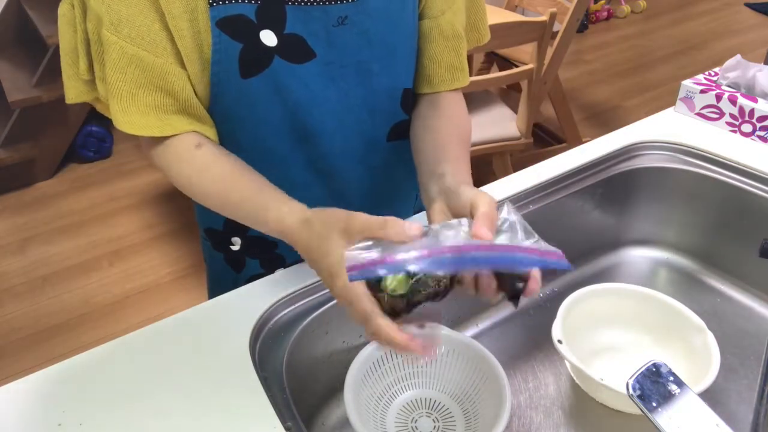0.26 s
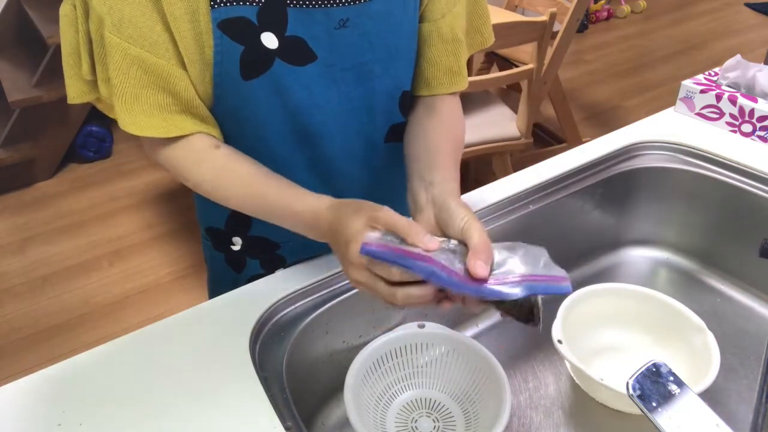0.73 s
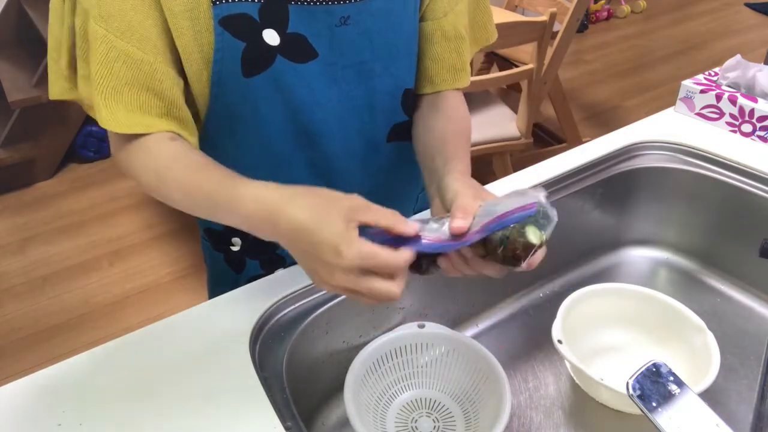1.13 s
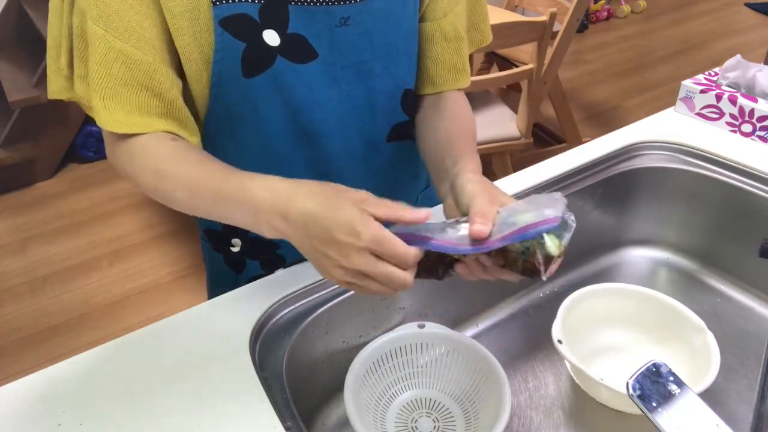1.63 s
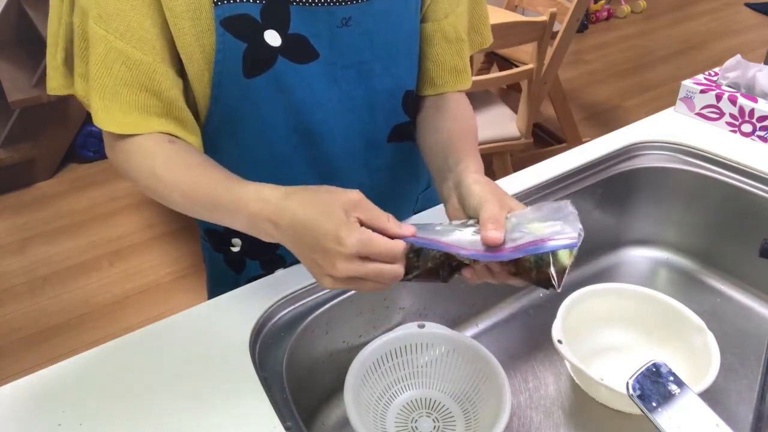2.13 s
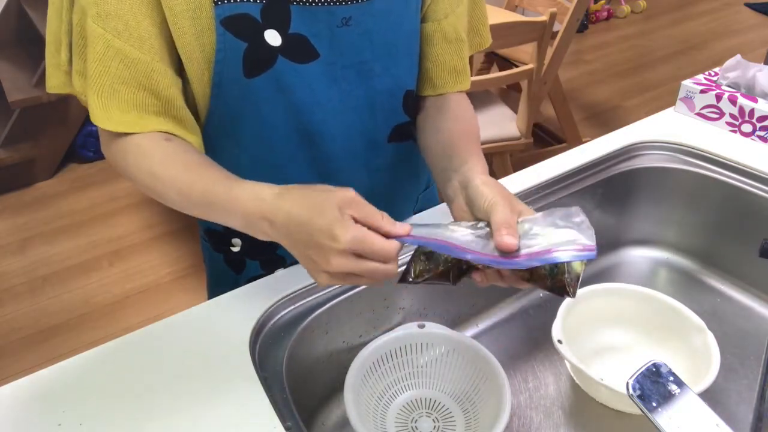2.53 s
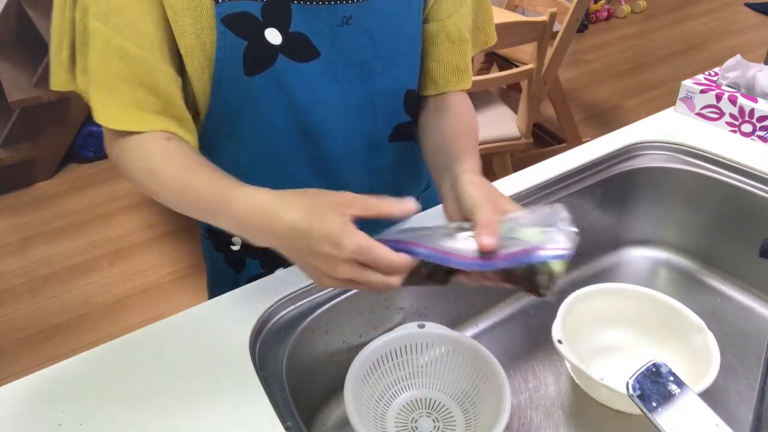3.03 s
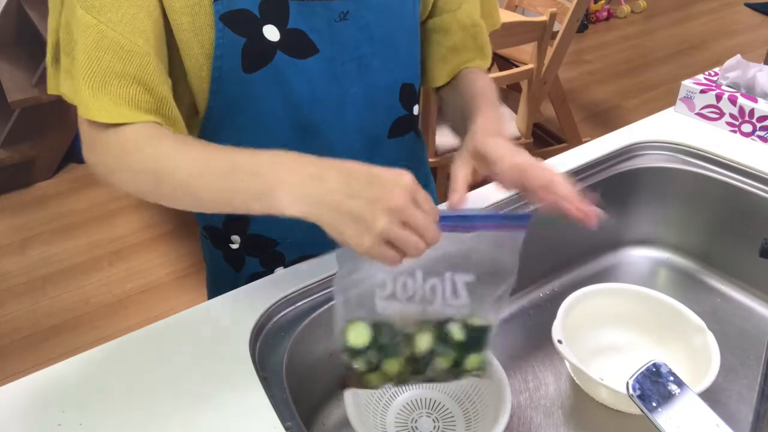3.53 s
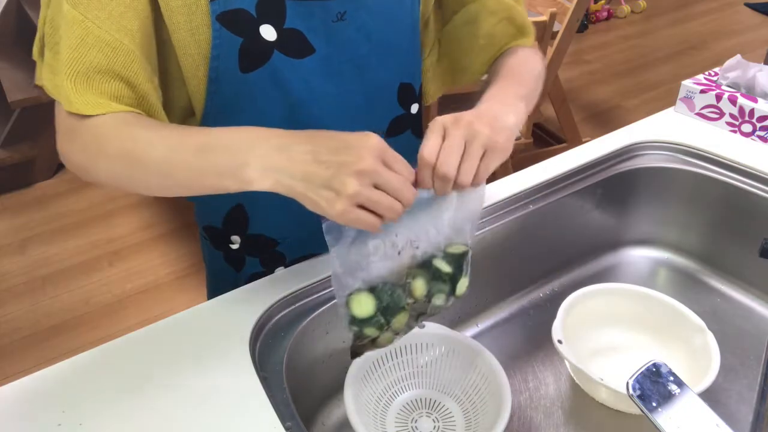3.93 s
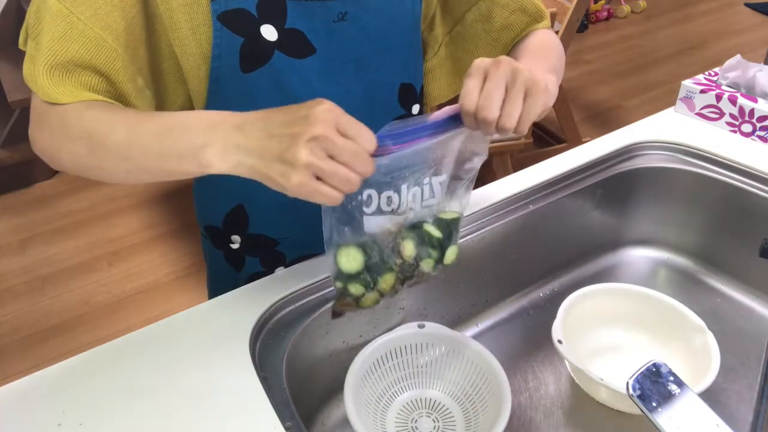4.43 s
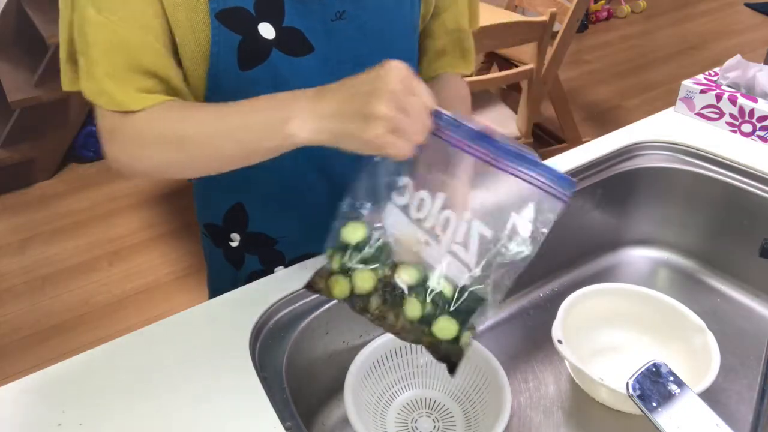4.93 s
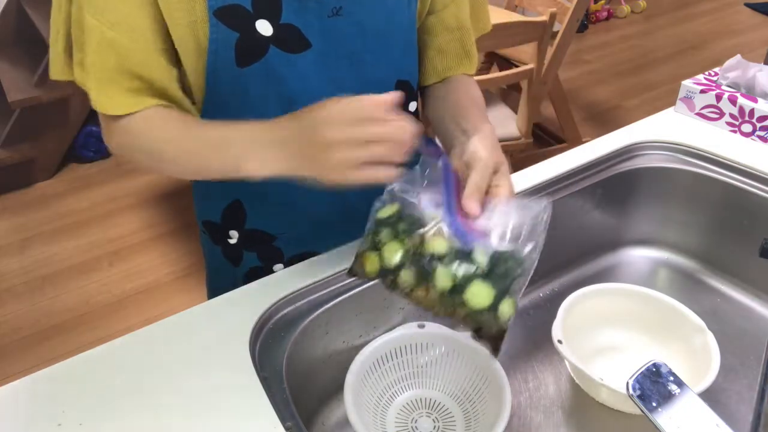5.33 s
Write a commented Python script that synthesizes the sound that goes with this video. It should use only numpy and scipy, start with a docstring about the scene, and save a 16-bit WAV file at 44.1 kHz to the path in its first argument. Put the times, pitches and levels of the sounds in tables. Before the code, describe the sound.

Thin plastic film crackles busily at first, then quiets so that irregular, sharp clicks of a seal being pressed stand out alone. Past the middle the bag crumples suddenly with a deep thump and wet slosh. Fingers slide faintly along the ridge, crackle thins to almost nothing, then rustling returns to the end. Close microphone, small kitchen with brief sink reflections and quiet bassy hum.

```python
"""Hands press shut the seal of a plastic zipper bag over a steel sink in a kitchen, over a quiet room hum.
For the first second snaps crowd over crackle; then bright seal snaps come singly until a busier burst
with a heavy thud near 3.4 s. Fingers hiss along the ridge, crackle thins, and a last flurry starts near 4.9 s.
Snaps and crackles are noise-kicked short rings, taps fading sines, the rest shaped noise and soft blows;
sparse echoes and fading noise answer all but the thudding, sloshing contents and the hum."""
import sys
import numpy as np
from scipy import signal
from scipy.fft import rfft, irfft
from scipy.io import wavfile
from scipy.ndimage import uniform_filter1d

SR = 44100
rng = np.random.default_rng(int(sys.argv[2]) if len(sys.argv) > 2 else 0)


def dump(signal):
    """Clip the signal to [-1, 1] and save it as 16-bit WAV at the path in sys.argv[1]."""
    limited = np.clip(np.atleast_2d(signal).T, -1, 1)
    pcm = np.round(limited * 32767).astype(np.int16)
    wavfile.write(sys.argv[1], SR, pcm)


N = 245637

POP_SPAN_S = .0008  # pop levels are nominal rms over this span
LOWEST_HZ, LOWEST_SPREAD_OCT = 830, .18
UPPER_HZ, LOWER_HZ, NEIGHBOUR_SPREAD_OCT = 5280, 2410, 0.33


def pops():
    """Loud single snaps: seal and creases let go abruptly and ring at their own pitches."""
    start_s, ring_db, pitch_hz = pop_rings()
    count = len(start_s)
    ring_hz = pitches(count)
    spread = 2 ** (NEIGHBOUR_SPREAD_OCT * rng.standard_normal(count))
    ring_hz[0] = LOWEST_HZ * 2 ** (LOWEST_SPREAD_OCT * rng.standard_normal(count))
    ring_hz[1] = np.where(pitch_hz < SPLIT_HZ, pitch_hz, LOWER_HZ * spread)
    ring_hz[2] = np.where(pitch_hz < SPLIT_HZ, UPPER_HZ * spread, pitch_hz)
    return np.sqrt(POP_SPAN_S * SR) * film(start_s, ring_db, ring_hz, slip_s=0.00009)


# pops of seal and creases: start_s, level_db, pitch_hz, lowest_ring_db (re level), highest_ring_db (re level)
SNAPS = [(0.0083, -24, 2320, -23, 1), (0.015, -17.5, 2380, -18, -2), (0.0289, -13.5, 1940, -28, -20),
         (0.106, -18.5, 1680, -11, -6), (0.1132, -22.5, 2580, -17, -14), (0.1262, -21.5, 4610, -16, -12),
         (0.148, -27, 6800, -11, 0), (0.1535, -20.5, 5400, -20, -27), (0.1778, -28, 6840, -25, -13),
         (0.2008, -31, 1850, -5, -19), (0.225, -23.5, 3796, -35, -8.5), (0.2824, -46, 4290, 10, -10),
         (0.2984, -22.5, 2300, -23, -25), (0.3085, -31, 2890, -23, 3.5), (0.3258, -25.5, 3060, -2.5, -30),
         (0.338, -25.5, 4710, -15, -25), (0.3476, -24.5, 2530, -5, -8), (0.3536, -20, 2580, -8.5, -9),
         (0.374, -21.5, 2100, -14, -21), (0.3936, -19, 2760, -17, -24), (0.4124, -28, 5430, -23, -19),
         (0.4438, -20, 3340, -35, -14), (0.4471, -22.5, 2660, -4, -22), (0.4582, -20, 4660, -11, 2),
         (0.4774, -20, 2600, -6, -27), (0.4922, -19.5, 4230, -25, -10), (0.5122, -27, 3570, -16, -23),
         (0.5429, -25, 2290, -8, -12), (0.5527, -14, 6900, -12, -4), (0.5674, -17.5, 3000, -12, -8),
         (0.601, -23, 2120, -22, -30), (0.6186, -22.5, 2780, -14, -15), (0.6372, -23.5, 2240, -18, -13),
         (0.6519, -22, 2540, -25, -4), (0.6564, -24.5, 1870, -21, 2), (0.6884, -15, 2540, -5.5, -3.5),
         (0.7734, -18.5, 6370, -12, -6.5), (0.8039, -18, 2480, -11, -20), (0.8242, -25, 3960, -19, -9),
         (0.885, -32.5, 2540, -21, -30), (0.978, -30.5, 2650, 3.5, -10), (1.0894, -43.5, 2420, -8, -23),
         (1.109, -40, 2840, -7, -12), (1.1348, -38, 1510, -3, -17), (1.163, -38.5, 2070, -7, -31),
         (1.1826, -46, 2670, -13, -13), (1.3052, -46, 2210, -4, -32), (1.4059, -19.5, 6000, -12.5, -5.5),
         (1.586, -43.5, 5660, 1, -3), (1.6556, -38.5, 2400, 7.5, -22), (1.7035, -13.5, 6850, -14, 2),
         (1.7259, -8.5, 6630, -22, -8), (1.777, -23.5, 3330, -11.5, -21), (1.9353, -29.5, 2580, -2, -48),
         (1.967, -29, 1940, -18, -35), (2.0087, -45, 5640, -14, 2), (2.0143, -44, 6240, -5, -1),
         (2.0215, -35, 2760, -7, -27), (2.0336, -24, 4730, -8, -19), (2.0456, -14, 6460, -19.5, 6.5),
         (2.0638, -24.5, 6170, -6, -3), (2.067, -13, 6550, -20, 2.5), (2.1016, -25, 4010, -10.5, -10),
         (2.2874, -31.5, 2600, 1, -1.5), (2.3364, -35.5, 3750, -7, -27), (2.3476, -33, 1510, -6, -11),
         (2.3699, -44, 5200, 2.5, -10), (2.3921, -11, 6140, -27.5, -2), (2.4225, -26.5, 2710, -32, 0),
         (2.669, -42.5, 2400, 0, -10), (2.7001, -42, 2020, -12, -30), (2.7099, -12, 6500, -23, 2),
         (2.8994, -42, 2240, -18, -16), (2.9113, -38.5, 1920, -15.5, -7), (2.926, -40.5, 1510, -6, -10),
         (3.1054, -44, 3620, 3, -16), (3.1377, -34.5, 1970, -15, -9), (3.1518, -32, 1980, -5, -37),
         (3.1788, -35, 1840, -9, -25), (3.2286, -26.5, 2540, -5.5, -16), (3.2609, -32.5, 3100, -2, -20),
         (3.2782, -20.5, 3560, -13, -3.5), (3.281, -25, 6020, -27, -7), (3.2913, -23, 4090, -8, -3),
         (3.2959, -20.5, 2300, -3.5, -3), (3.3512, -17, 2240, -15, -18), (3.3606, -19.5, 3140, -11, -21),
         (3.3701, -11, 4660, -17, -10), (3.395, -20, 2500, -7, -21), (3.4433, -24, 2430, -4, -7),
         (3.5182, -29.5, 2450, 1, -22), (3.6033, -36.5, 1560, -1, -6), (3.6505, -48, 6350, 16.5, 1),
         (3.6992, -35.5, 3300, -3.5, -3.5), (3.915, -50, 1950, -5, -1), (4.0084, -29, 7400, -23, -0.5),
         (4.2036, -45, 2020, -8, -27), (4.2283, -45, 1700, -17, -6), (4.356, -46, 2240, 3, -27),
         (4.3666, -42.5, 2240, -6, -18), (4.3961, -40.5, 4340, 3, -13), (4.4662, -43, 1940, -2, -29),
         (4.479, -45, 6300, -10, -6), (4.5043, -50.5, 1510, 10, -20), (4.5336, -49, 1590, 5, -29),
         (4.6005, -39.5, 2430, 1.5, -21), (4.6036, -33.5, 3840, -20, -30), (4.6251, -39.5, 1510, 4, -24),
         (4.7036, -39, 2020, -0.5, -24), (4.7561, -44.5, 1500, 0, 0), (4.9285, -37, 6680, 4.5, -8),
         (4.9388, -19.5, 2720, 1, -27), (4.9933, -30, 1890, -13, -7), (5.017, -30, 2020, -7, -9),
         (5.034, -40, 1510, 7, -30), (5.0427, -33, 1510, 4, -2), (5.105, -22.5, 2720, -10, -3.5),
         (5.1732, -27.5, 1940, -7, -13), (5.195, -30, 2370, -5, -10), (5.1989, -15, 2160, -23, -4),
         (5.2425, -33, 3960, -25, -17), (5.2693, -15, 2420, -34, -3.5), (5.2832, -24, 2300, -28, -23),
         (5.3021, -26, 5700, -3, -19), (5.3278, -27, 1680, -2, 1), (5.3496, -21, 3340, -4.5, -11),
         (5.392, -34, 2500, -6, -32), (5.4474, -24, 2980, -7, -7), (5.451, -33, 5600, -22, -14),
         (5.503, -47, 7100, -15, -16)]
SPLIT_HZ = 3800  # main ring: second below, third above
UPPER_SHARE, LOWER_SHARE = 0.41, 0.5  # lean of the neighbour ring to the outer ring beside it


def pop_rings():
    """Start, ring levels and pitch of each pop; the neighbour of the main ring leans to the outer one."""
    start_s, level_db, pitch_hz, lowest_db, highest_db = np.transpose(SNAPS)
    low = pitch_hz < SPLIT_HZ
    second_db = level_db + LOWER_SHARE * lowest_db * ~low
    third_db = level_db + UPPER_SHARE * highest_db * low
    return start_s, [level_db + lowest_db, second_db, third_db, level_db + highest_db], pitch_hz


# film rings, lowest first: usual_hz, pitch_spread_oct, t60_s
FILM_RINGS = [(800, .3, .003), (2400, .35, .0014), (6000, .35, .0007), (12000, .1, .0003)]


def film(start_s, ring_db, ring_hz, slip_s, size=256):
    """A crease gives way in a short stutter that kicks all the rings together."""
    t = np.arange(size) / SR
    kick = rng.standard_normal((len(start_s), size)) ** 3 * np.exp(-t / slip_s)
    rings = 0
    for k, ((_, _, t60_s), db, hz) in enumerate(zip(FILM_RINGS, ring_db, ring_hz)):
        # swelling before the fade keeps a ring out of its neighbours' range
        shape = np.sin(2 * np.pi * hz[:, None] * t) * t * 1000. ** (-t / t60_s)
        ring = signal.fftconvolve(kick, shape, axes=1)[:, :size]
        ring = ring * undb(db)[:, None] / np.linalg.norm(ring, axis=1, keepdims=True)
        # opposite senses let neighbouring rings fill the gap between them
        rings = rings + (-1) ** k * ring
    place = (np.clip(start_s, 0, None) * SR).astype(int)[:, None] + np.arange(size)
    out = np.bincount(place.ravel(), rings.ravel(), N + 2 * size)[:N]
    # thin film moves no air in the bass
    return signal.sosfilt(signal.butter(2, 220, "high", fs=SR, output="sos"), out)


def pitches(count):
    """Every crease has its own size, so its rings have their own pitch."""
    usual_hz, spread_oct, _ = np.transpose(FILM_RINGS)
    ring_hz = usual_hz * 2 ** (spread_oct * rng.standard_normal((count, len(usual_hz))))
    return np.clip(ring_hz, 100, .4 * SR).T


# how busy the hands are: time_s, crackle_db (before size and gain), top_end_db (re crackle)
HANDS = [(0, -24.5, 3.5), (.1, -31.5, -7.5), (.28, -46.5, -9), (.31, -37, -2), (.34, -38, 4),
         (.5, -33.5, -5), (.68, -37, -1.5), (.84, -42, -9), (.95, -51, 0), (1.12, -58.5, -9),
         (1.33, -66, -3), (1.62, -56, -3), (1.9, -55.5, -12), (2.03, -47, -4), (2.24, -60.5, 4),
         (2.36, -50, 1.5), (2.59, -64, -2), (2.68, -56, 4), (2.87, -61, -2), (2.94, -60.5, -6),
         (3.02, -61, 5), (3.1, -44.5, -1.5), (3.22, -53, -1), (3.3, -37, -2), (3.34, -39, 1),
         (3.365, -23.5, -3), (3.41, -33.5, -4), (3.5, -47, -11), (3.7, -58, -1.5), (4.33, -61, -1.5),
         (4.41, -52, -11.5), (4.74, -56.5, -1), (4.86, -69, -9), (4.96, -34, -10.5), (5.1, -47.5, -3),
         (5.16, -50, 0), (5.19, -37.5, -5), (5.26, -33.5, -5), (5.45, -47.5, -9), (5.57, -58, -4)]
BODY_DB, TOP_SHARE, TOP_DB = -4, .67, -4  # lowest ring re crackle; highest ring follows the top end


def crackle(count=4500):
    """Many small creases let go at random, under the hands and after each pop; a few are much bigger."""
    chance = rng.random((count, 6))
    at = (chance[:, 0] * (N - 1)).astype(int)
    pop_s, pop_db, _ = pop_rings()
    crackle_db, top_db = curve(HANDS)
    tilt_db = [BODY_DB, 0, top_db, TOP_SHARE * top_db + TOP_DB]
    size_db = np.minimum(-4.2 * np.log(chance[:, 1]), 15) - 3 + 3.1 * walk(60)[at]
    ring_db = []
    for tilt, db, luck in zip(tilt_db, pop_db, chance[:, 2:].T):
        power = undb(crackle_db + tilt) ** 2 + settling(db, pop_s)
        ring_db.append(10 * np.log10(power)[at] + size_db + 8 * (luck - .5))
    return undb(6) * film(at / SR, ring_db, pitches(count), slip_s=0.00028)


AFTER_DB, AFTER_T60_S = -20.5, 0.29  # start re pop ring, fade


def settling(ring_db, start_s):
    """Creases settle after each pop: crackle power jumps and dies away."""
    jumps = np.bincount((start_s * SR).astype(int), undb(ring_db + AFTER_DB) ** 2, N)
    return signal.lfilter([1], [1, -1e6 ** (-1 / (AFTER_T60_S * SR))], jumps)


# taut pockets of the bag: start_s, initial_amplitude_db, pitch_hz
POCKETS = [(.689, -22, 690), (.805, -30, 680), (.978, -30, 1130), (1.656, -38, 1150), (1.936, -36, 600),
           (3.651, -32, 690), (4.604, -36, 3950), (5.199, -20, 2300), (5.27, -20, 2330)]
TAP_T60_CYCLES = 28


def taps(size=4096):
    """Hollow taps: each taut pocket rings at one pitch and fades in a set number of cycles."""
    start_s, amplitude_db, pitch_hz = np.transpose(POCKETS)[:, :, None]
    cycles = pitch_hz * np.arange(size) / SR
    ring = undb(amplitude_db) * np.sin(2 * np.pi * cycles) * 1000. ** (-cycles / TAP_T60_CYCLES)
    place = (start_s * SR).astype(int) + np.arange(size)
    return np.bincount(place.ravel(), ring.ravel(), N)


# finger and thumb run along the seal: time_s, gain_db
SLIDE_GAIN = [(3.7, -79), (3.8, -68), (3.87, -68), (3.92, -54.5), (4.0, -56), (4.12, -54.5), (4.2, -62),
              (4.3, -60), (4.34, -65)]
# spectrum of the rubbed ridge: freq_hz, density_db (per Hz, relative)
RIDGE_SPECTRUM = [(900, -26.5), (2300, 8), (2900, -23), (3600, 3.5), (5000, -3.5), (6500, -1), (8000, -19),
                  (12000, -5.5)]


def fingers():
    """Skin rubbing on the ridge hisses unevenly."""
    hiss = colour(rng.standard_normal(N), RIDGE_SPECTRUM) * undb(2.5 * walk(35))
    return level(hiss, -1.3) * undb(curve(SLIDE_GAIN)[0])


# contents knocking in the bag: start_s, thud_db, slosh_db (both before knock and wobble gains)
KNOCKS = [(0.019, -54, -49), (0.057, -37, -36), (0.111, -46, -32), (0.353, -51, -43), (0.451, -49, -41),
          (0.489, -52, -33), (0.559, -49, -38), (0.704, -52, -26.5), (0.824, -72, -47), (0.92, -42.5, -67),
          (0.986, -35.5, -36.5), (1.032, -43, -53), (1.087, -55, -53), (1.188, -53, -62), (1.409, -63, -49),
          (1.513, -65, -47), (1.59, -44.5, -44), (1.659, -57, -40), (1.712, -58, -34), (1.942, -61, -40),
          (2.055, -55, -34), (2.358, -60, -41), (2.4, -63, -42), (2.669, -50, -59), (2.716, -64, -51),
          (2.934, -43, -36.5), (3.114, -57, -53), (3.235, -49, -34), (3.306, -45, -30), (3.367, -24.5, -23),
          (3.445, -54, -35), (3.523, -50, -51), (3.634, -28, -46), (3.654, -42, -34), (3.705, -49, -56),
          (3.754, -44, -59), (3.811, -43, -62), (4.155, -42, -62), (4.208, -50, -51), (4.262, -55, -51),
          (4.382, -35.5, -36.5), (4.474, -54, -42.5), (4.539, -43, -46), (4.64, -43, -45),
          (4.703, -40.5, -39), (4.757, -48, -51), (4.946, -44, -38.5), (4.986, -42, -34), (5.042, -45, -28),
          (5.131, -57, -34), (5.186, -55, -31.5), (5.229, -55, -41), (5.311, -64, -32), (5.361, -69, -33.5),
          (5.455, -65, -41)]
# thud spectrum: freq_hz, density_db (per Hz, relative)
THUD_SPECTRUM = [(30, -39), (55, -4), (85, 5.5), (120, -1.5), (200, -49)]
# slosh spectrum: freq_hz, density_db (per Hz, relative)
SLOSH_SPECTRUM = [(90, -15), (150, -0.5), (200, -6.5), (255, 3.5), (310, -9), (370, -5.5), (600, -10),
                  (1200, -40)]
THUD_FALL_S, SLOSH_FALL_S = 0.031, 0.015
THUD_BED_DB, SLOSH_BED_DB = -62, -4.5  # thud bed steady; slosh bed re crackle column, so it follows the hands


def contents():
    """Wet slices slide and knock softly inside the bag, as deep thuds and higher sloshing."""
    start_s, thud_db, slosh_db = np.transpose(KNOCKS)
    slosh_bed = undb(curve(HANDS)[0] + SLOSH_BED_DB)
    thuds = bumps(start_s, thud_db, THUD_SPECTRUM, THUD_FALL_S, undb(THUD_BED_DB))
    return thuds + bumps(start_s, slosh_db, SLOSH_SPECTRUM, SLOSH_FALL_S, slosh_bed)


BUMP_RISE_S = 0.0093
KNOCK_DB, WOBBLE_DB = 2.5, 1  # blow and shaking re bump


def bumps(start_s, bump_db, spectrum, fall_s, bed):
    """Each bump is one soft blow, with shaking that swells up to it and falls away over a bed."""
    blows = np.bincount((start_s * SR).astype(int), undb(bump_db), N)
    t = np.arange(-SR // 4, SR // 4 + 1) / SR
    swell_shape = np.exp(np.minimum(t / BUMP_RISE_S, -t / fall_s))
    swell = signal.fftconvolve(blows, swell_shape, "same")
    shaking = level(colour(rng.standard_normal(N), spectrum) * undb(1.6 * walk(25)), -1.2)
    knock = colour(1. * (t == 0), spectrum)
    knocks = signal.fftconvolve(blows * rng.choice([-1, 1], N), knock / knock.max(), "same")
    return undb(KNOCK_DB) * knocks + shaking * (undb(WOBBLE_DB) * swell + bed)


def kitchen(x, count=6):
    """Creases lie all over the moving bag: every 30 ms a spot is drawn, each with its own echoes."""
    hold = SR // 33
    spot = np.repeat(rng.integers(0, count, N // hold + 1), hold)[:N]
    return sum(signal.fftconvolve(x * (spot == k), answer())[:N] for k in range(count))


# echoes off hands, counter, sink floor: usual_delay_s, level_db
NEAR_ECHOES = [(.0008, -10), (.0017, -7), (.0037, -11)]
# scatter off rim and bowls, then inside the basin: level_db, t60_s, top_hz
SINK_SCATTER = [(-0.5, 0.037, 22000), (-3.5, 0.12, 7200)]
# room decay by band: centre_hz, t60_s
ROOM_DECAY = [(300, 0.31), (800, 0.12), (2100, 0.27), (5500, 0.38), (12000, 0.22)]
ROOM_DB = -9


def answer():
    """Near surfaces echo first, the sink scatters briefly, the room dies away band by band."""
    t = np.arange(int(.5 * SR)) / SR
    noise, tail = rng.standard_normal(len(t)), 0
    for hz, t60_s in ROOM_DECAY:
        edges_hz = np.clip([hz / 2.0, hz * 1.294], 50, .45 * SR)
        band = signal.butter(2, edges_hz, "band", fs=SR, output="sos")
        tail = tail + signal.sosfilt(band, noise) * 1000. ** (-t / t60_s)
    tail = tail * (1 - np.exp(-t / 0.0055))
    out = undb(ROOM_DB) * tail / np.linalg.norm(tail)
    for db, t60_s, top_hz in SINK_SCATTER:
        scatter = signal.lfilter(*signal.butter(1, top_hz, fs=SR), rng.standard_normal(len(t)))
        scatter *= 1000. ** (-t / t60_s) * (1 - np.exp(-t / 0.00013))
        out += undb(db) * scatter / np.linalg.norm(scatter)
    out[0] += 1  # direct sound
    for delay_s, db in NEAR_ECHOES:
        out[int(delay_s * SR * rng.uniform(.85, 1.15))] += undb(db) * rng.choice([-1, 1])
    return out


# room hum spectrum: freq_hz, density_db (per Hz, relative)
HUM_SPECTRUM = [(25, -33), (60, -4.5), (250, -7), (600, -13.5), (2400, -28), (6500, -34.5), (10500, -33),
                (15000, -32.5)]


def room_hum():
    """Steady noise, weighted to the bass."""
    return level(colour(rng.standard_normal(N), HUM_SPECTRUM), -50.5)


def undb(db):
    """Decibels to amplitude ratio."""
    return 10 ** (np.asarray(db) / 20)


def level(x, rms_db):
    """Scale a sound to an rms level."""
    return x * undb(rms_db) / np.sqrt(np.mean(x ** 2))


def curve(table):
    """Columns of a (time_s, ..) table, one value per sample."""
    time_s, *columns = np.transpose(table)
    return [np.interp(np.arange(N) / SR, time_s, c) for c in columns]


def colour(x, table):
    """Shape a spectrum by (freq_hz, db) points, interpolated over log frequency."""
    hz, db = np.transpose(table)
    bin_hz = np.arange(len(x) // 2 + 1) * SR / len(x) + 1  # +1 avoids log 0
    gain = undb(np.interp(np.log(bin_hz), np.log(hz), db))
    return irfft(rfft(x) * gain, len(x))


def walk(rate_hz):
    """Random values, a new one every 1 / rate_hz s, joined by slews."""
    k = int(SR / rate_hz)
    return uniform_filter1d(np.repeat(rng.standard_normal(N // k + 1), k), k)[:N]


def scene():
    """Bag and fingers answered by the kitchen, plus contents and hum."""
    hum = room_hum()
    bag = pops() + taps() + crackle() + fingers()
    return (kitchen(bag) + contents() + hum)[None]


# microphone response: freq_hz, gain_db
MIC_RESPONSE = [(20, -23), (45, 1), (70, -4), (3000, 0.5), (6500, 0.5), (9000, -0.5), (10400, -4),
                (12000, -3), (15500, -1.5)]
TOP_HZ = 15800


def record(dry):
    """The microphone colours the sound, peaks clip, then a steep low-pass cuts the top."""
    heard = np.clip(colour(dry[0], MIC_RESPONSE), -.95, .95)[None]
    return signal.sosfilt(signal.ellip(10, .2, 70, TOP_HZ, fs=SR, output="sos"), heard)


dry = scene()
out = record(dry)
dump(out)
```